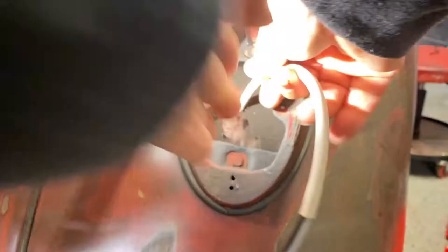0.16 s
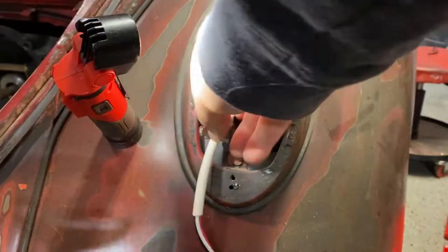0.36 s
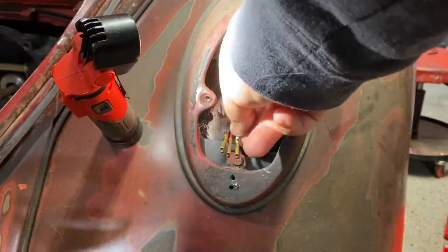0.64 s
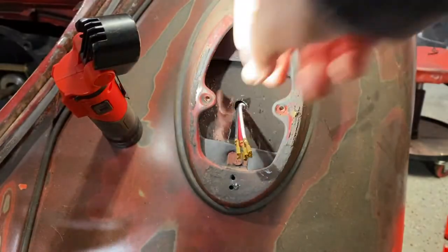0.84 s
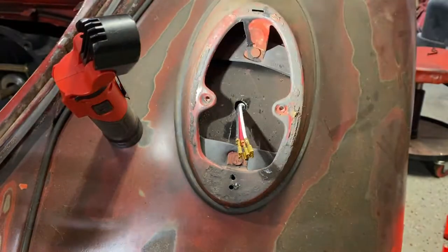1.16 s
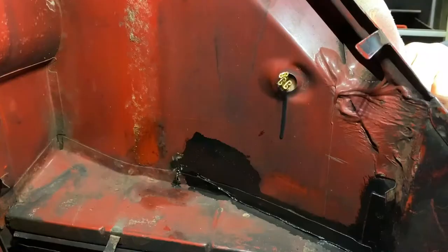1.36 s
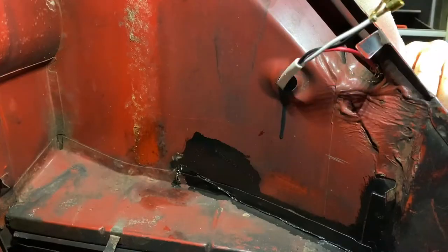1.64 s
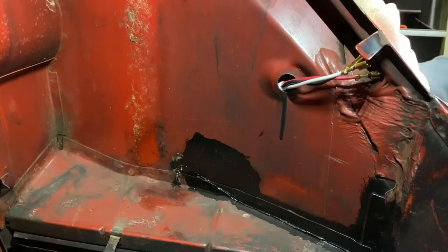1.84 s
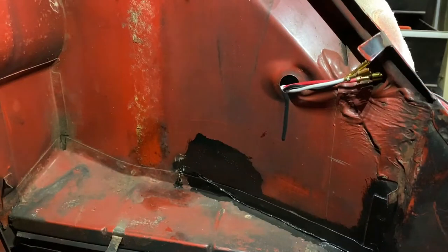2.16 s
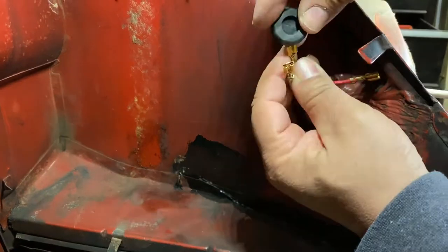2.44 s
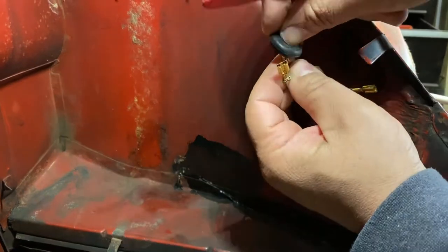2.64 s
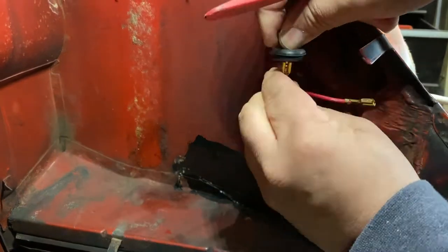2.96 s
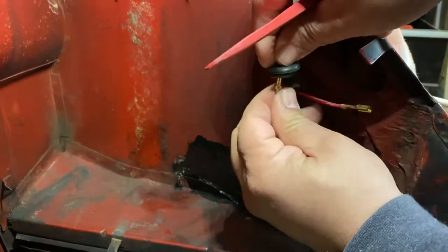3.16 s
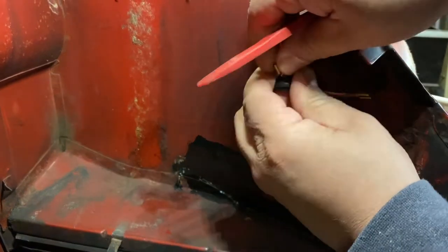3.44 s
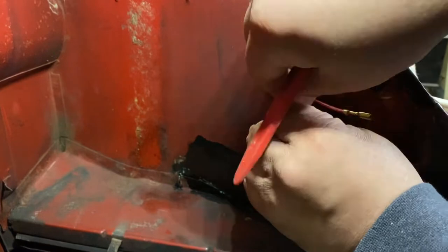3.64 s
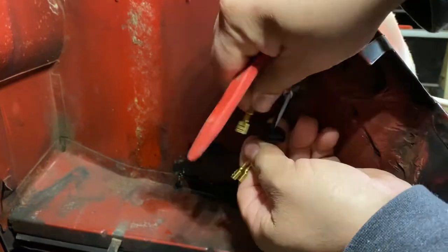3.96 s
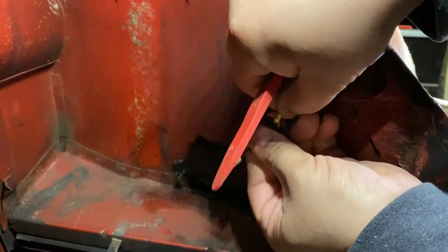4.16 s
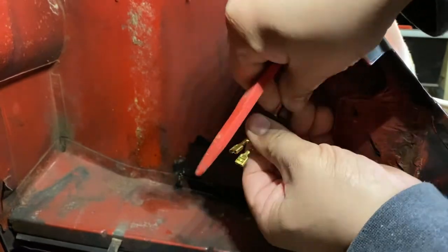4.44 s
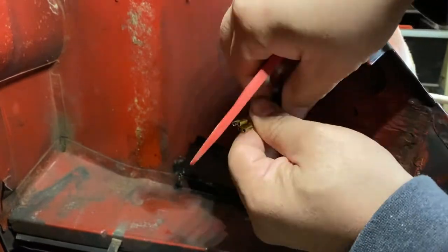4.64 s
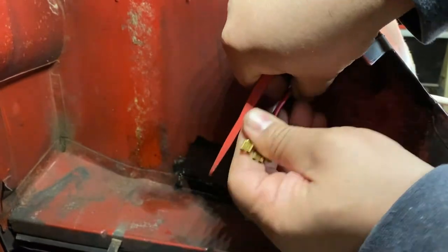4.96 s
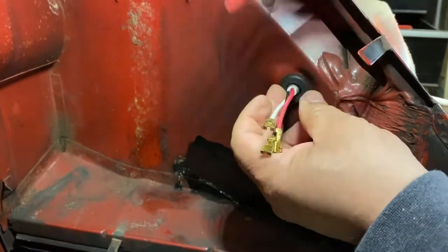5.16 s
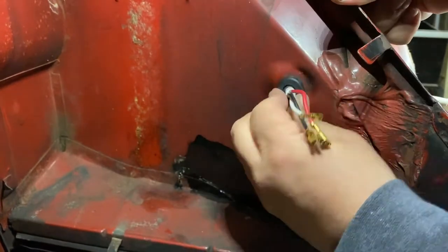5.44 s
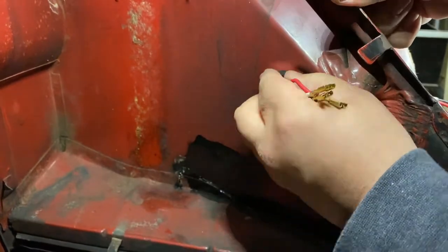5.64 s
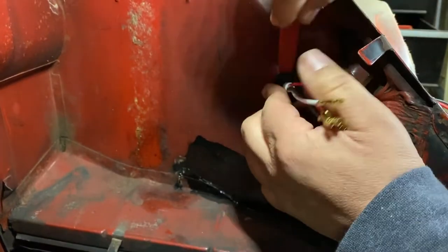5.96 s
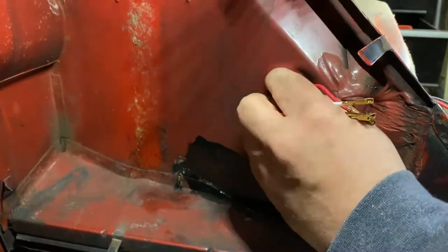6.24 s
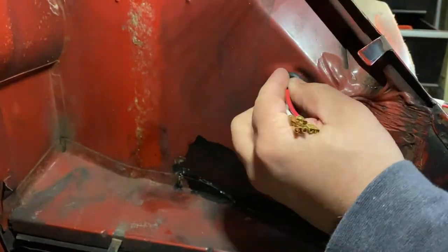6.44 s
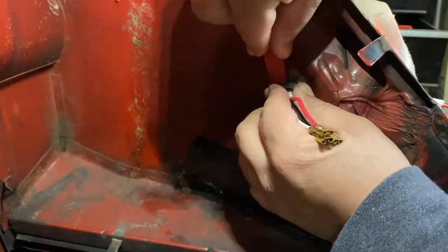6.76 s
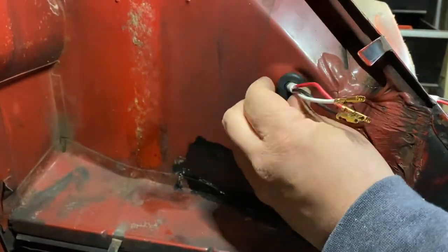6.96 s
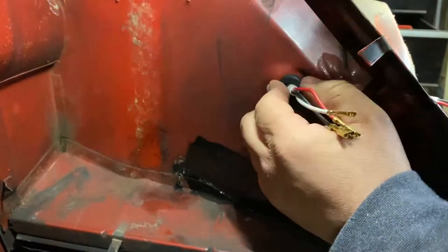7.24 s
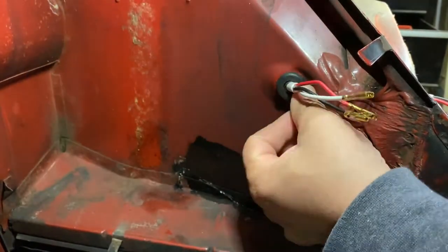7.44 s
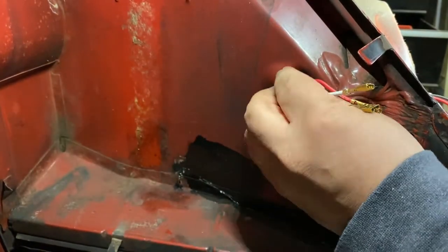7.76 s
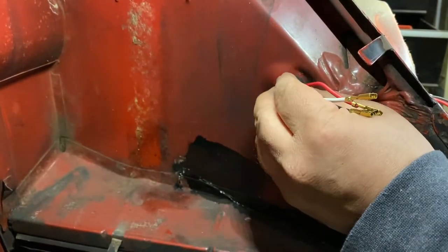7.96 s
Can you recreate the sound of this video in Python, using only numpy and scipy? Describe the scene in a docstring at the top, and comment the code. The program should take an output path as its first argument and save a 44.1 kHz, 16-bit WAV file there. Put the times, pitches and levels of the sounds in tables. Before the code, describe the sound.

Hands push wires through a hollow steel panel and work in a rubber grommet, with soft thuds, rubs and tiny metallic clicks in a quiet workshop.

```python
"""A bundle of wires is nudged through a hole in a bare steel car body and a rubber grommet is worked into it:
each nudge is a burst of random slips ringing a damped panel mode (thud) and a rub resonance, plus scratch noise.
Sleeves swish (dense slips), brass terminals clink (resonated chatter), fingers rustle (shaped friction),
and the panel rings on when let go (decaying noise bands). The shell's rumble and the workshop's hum
are shaped noise; a thin electrical whine is two sines."""
import sys
import numpy as np
from scipy import signal
from scipy.fft import rfft, irfft, next_fast_len
from scipy.io import wavfile
from scipy.ndimage import map_coordinates

SR = 44100
rng = np.random.default_rng(int(sys.argv[2]) if len(sys.argv) > 2 else 0)


def master(y):
    """Save y as 16-bit WAV."""
    cut = np.clip(np.atleast_2d(y).T, -1, 1)
    pcm = np.round(cut * 32767)  # scale
    wavfile.write(sys.argv[1], SR, pcm.astype(np.int16))


N = 357077
TIME = np.arange(N) / SR

# hand activity between shoves, before trims, in two runs of rows: time_s, press_db, rub_db, rustle_db
HAND_ACTIVITY = np.vstack([
    [(0, -61.5, -59, -73.5), (.74, -64.5, -58.5, -79), (.87, -84, -79, -87), (1.02, -73, -73, -73.5),
     (1.29, -84, -81, -90)],
    [(1.35, -55, -59.5, -65), (1.54, -50, -56.5, -68), (1.76, -63.5, -67, -82), (2.02, -65.5, -63, -64.5),
     (2.42, -61.5, -64, -70.5), (2.59, -82.5, -82, -81.5), (2.78, -63.5, -66, -71),
     (3.02, -62.5, -82, -81.5), (3.56, -62, -77, -81.5), (3.87, -58, -60.5, -72), (4.1, -76, -78, -87),
     (4.42, -60.5, -66, -78.5), (4.95, -62.5, -75, -74), (5.22, -64.5, -65.5, -69), (5.72, -61, -74, -83.5),
     (6.2, -52, -64, -69.5), (6.74, -55.5, -65, -79.5), (7.2, -69, -78, -74), (7.52, -64.5, -69, -75),
     (7.68, -84.5, -94, -91), (8.1, -86, -88.5, -95.5)],
])
# spectrum of the shell's slow movement: freq_hz, relative_db
SWAY_SPECTRUM = [(20, -19), (35, -10), (58, -3), (85, -1), (120, -7.5), (170, -7.5), (260, -18)]
# spectrum of light sliding and rustling: freq_hz, relative_db
HISS_SPECTRUM = [(1500, -28), (2600, -6), (4000, -2.5), (6300, -2.5), (8500, -5.5), (12000, -9.5),
                 (15500, -16)]


def from_db(db):
    """Amplitude ratio of a level in dB."""
    return 10 ** (np.asarray(db) / 20)


def rms_one(x):
    """Scale to rms 1."""
    return x / np.sqrt(np.mean(x ** 2) + 1e-30)


def in_time(rows):
    """Columns of a breakpoint curve at every sample."""
    time_s, *columns = np.transpose(rows)
    return [np.interp(TIME, time_s, column) for column in columns]


def drift(rate_hz):
    """Smooth random wander through rate_hz random knots a second; rms 1."""
    knots = rng.standard_normal(4096)
    return rms_one(map_coordinates(knots, [TIME * rate_hz], order=2, mode="wrap"))


def colour(x, spectrum):
    """Filter by a spectrum that falls 24 dB/octave beyond its ends; rms 1."""
    freq_hz, level_db = np.transpose(spectrum)
    size = next_fast_len(N)
    octave = np.log2(np.maximum(np.arange(size // 2 + 1) * SR / size, 1))
    beyond_oct = np.abs(octave - np.clip(octave, np.log2(freq_hz[0]), np.log2(freq_hz[-1])))
    gain = from_db(np.interp(octave, np.log2(freq_hz), level_db) - 24 * beyond_oct)
    return rms_one(irfft(rfft(x, size) * gain, size)[:, :N])


def resonate(x, freq_hz, width_hz):
    """Two-pole resonance, peak gain about 1."""
    radius = np.exp(-np.pi * width_hz / SR)
    zeros = np.array([1, 0, -1]) * (1 - radius ** 2) / 2
    poles = [1, -2 * radius * np.cos(2 * np.pi * freq_hz / SR), radius ** 2]
    return signal.lfilter(zeros, poles, x + 1e-18)


def spot(x, ripple_db, spacing_hz):
    """Random spectral ripple: each spot on the panel favours its own overlapping modes."""
    length = x.shape[-1]
    size = next_fast_len(length)
    freq_hz = np.arange(size // 2 + 1) * SR / size
    ripple = map_coordinates(rng.standard_normal(1024), [freq_hz / spacing_hz], order=2, mode="wrap")
    return irfft(rfft(x, size) * from_db(ripple_db * ripple), size)[:, :length]


def friction(slips_per_s, spread_db):
    """Random slip impulses of uneven size; the lag between the ports jumps at random, so the image is diffuse."""
    likeness, lag_spread_s, lag_hold = 0.7, .0009, 2048  # power share in common; hold in samples
    slips = np.zeros((3, N))
    slipping = rng.random((3, N)) < slips_per_s / SR
    sizes = rng.standard_normal((3, N))[slipping]
    signs = rng.choice([-1, 1], (3, N))[slipping]
    slips[slipping] = signs * from_db(spread_db * np.clip(sizes, -2, 2))
    shared, left, right = slips
    lag = np.repeat(rng.normal(0, lag_spread_s * SR, N // lag_hold + 1), lag_hold)[:N].astype(int)
    shifted = shared[np.clip(np.arange(N) + lag, 0, N - 1)]
    common, separate = np.array([shared, shifted]), np.array([left, right])
    return rms_one(np.sqrt(likeness) * common + np.sqrt(1 - likeness) * separate)


def around(mid_s):
    """Samples within 0.12 s of a touch."""
    return slice(max(int((mid_s - .12) * SR), 0), min(int((mid_s + .12) * SR), N))


def stroke(x, mid_s, half_s, level_db, steepness=1.71, skew=0.016):
    """Spindle-shaped envelope, nearly symmetric around mid_s; level_db is the level at its height."""
    age_s = TIME[around(mid_s)] - mid_s
    side_s = half_s * (1 + skew * np.sign(age_s))
    envelope = np.exp(-np.abs(age_s / side_s) ** steepness)
    return from_db(level_db) * rms_one(x * envelope) * np.sqrt(np.mean(envelope ** 2))


def workshop(air_db=-69.5, early_db=-7.5, waver_db=0.5):
    """Low shaped room noise, quieter early on, and a thin wavering whine with a steady octave."""
    whine_hz, overtone_hz, overtone_db = 7850, 15699, -88
    # room noise spectrum: freq_hz, relative_db
    air_spectrum = [(25, -17.5), (60, -1), (120, 0.5), (250, -17.5), (500, -29.5), (1000, -30.5),
                    (1700, -33.5), (3000, -44.5), (8000, -46.5), (15500, -43.5)]
    # electrical whine, mean level: time_s, level_db
    whine_curve = [(0, -104), (2.4, -98.5), (2.7, -88.5), (3.6, -85), (4.1, -89), (5.6, -86.5), (6.1, -95),
                   (8.1, -99)]
    level_db = air_db + early_db * np.clip(2.5 - TIME, 0, 1)
    air = from_db(level_db) * colour(rng.standard_normal((2, N)), air_spectrum)
    whine_db = in_time(whine_curve)[0] + waver_db * drift(rate_hz=9)
    whine = from_db(whine_db) * np.sin(2 * np.pi * whine_hz * TIME)
    overtone = from_db(overtone_db) * np.sin(2 * np.pi * overtone_hz * TIME)
    return air + np.sqrt(2) * (whine + overtone)  # sines to rms level


def sway(unsteady_db=3.5, lean_trim_db=6.5):
    """The big steel shell rumbles unevenly, more under harder pressing, and bumps softly when leaned on."""
    middling_db, middling_press_db, press_share, lean_half_s = -65.5, -65.5, 0.62, .028
    # an arm leans on the shell, level before trim: mid_s, level_db
    leans = [(.125, -63), (.44, -64), (1.89, -56), (2.0, -57), (3.9, -61), (4.62, -58.5), (4.92, -58.5),
             (5.66, -56.5), (7.639, -64)]
    press_db = in_time(HAND_ACTIVITY)[0]
    level_db = middling_db + press_share * (press_db - middling_press_db) + unsteady_db * drift(rate_hz=22)
    out = from_db(level_db) * colour(rng.standard_normal((2, N)), SWAY_SPECTRUM)
    heave = colour(rng.standard_normal((2, N)), SWAY_SPECTRUM)
    for mid_s, lean_db in leans:
        at = around(mid_s)
        out[:, at] += stroke(heave[:, at], mid_s, lean_half_s, lean_db + lean_trim_db)
    return out


def handling(grip_db=4.5, flicker_db=3.5, press_trim_db=-1.0, rub_trim_db=-3.5, rustle_trim_db=-2.5):
    """Fingers never quite stop: fine friction in three bands follows one unsteady grip."""
    # pressing spectrum: freq_hz, relative_db
    press_spectrum = [(110, -21.5), (190, -4), (310, 3.5), (450, -5), (650, -5), (1000, -24.5)]
    # rubbing spectrum: freq_hz, relative_db
    rub_spectrum = [(450, -17.5), (800, 4), (1300, 0), (1750, -1), (2400, -9), (3800, -16.5)]
    press_db, rub_db, rustle_db = in_time(HAND_ACTIVITY)
    bands = [(press_db + press_trim_db, press_spectrum),
             (rub_db + rub_trim_db, rub_spectrum),
             (rustle_db + rustle_trim_db, HISS_SPECTRUM)]
    grip = grip_db * drift(rate_hz=42)
    out = np.zeros((2, N))
    for level_db, spectrum in bands:
        grain = spot(friction(slips_per_s=2200, spread_db=4), ripple_db=2, spacing_hz=90)
        flicker = flicker_db * drift(rate_hz=67)
        out += from_db(level_db + grip + flicker) * colour(grain, spectrum)
    return out


def panel_ring(waver_db=5.5, mode_width_hz=45, trim_db=0.5):
    """Let go, the panel rings on: each mode is a narrow noise band, wavering as it decays."""
    # the hand lets go, level before trim: start_s, level_db
    releases = [(1.595, -50), (7.535, -54)]
    # free panel modes: freq_hz, relative_db, t60_s
    panel_modes = [(590, 3, 0.22), (1802, -10.5, 0.25), (3485, -17.5, 0.15)]
    out, noise = np.zeros((2, N)), rng.standard_normal((2, N))
    for freq_hz, mode_db, t60_s in panel_modes:
        waver = waver_db * drift(rate_hz=37)
        for start_s, level_db in releases:
            at = slice(int(start_s * SR), int(start_s * SR) + SR // 4)
            age_s = TIME[at] - start_s
            rise = np.minimum(age_s / .005, 1)
            ring = rms_one(resonate(noise[:, at], freq_hz, mode_width_hz))
            ring_db = level_db + trim_db + mode_db + waver[at] - 60 * age_s / t60_s
            out[:, at] += rise * from_db(ring_db) * ring
    return out


def swishes():
    """Sleeve or insulation slides lightly: very dense slips, no panel resonance."""
    # light slides: mid_s, half_s, brush_db, hiss_db
    slides = [(0.913, 0.0086, -51, -57), (0.941, 0.019, -61, -57), (1.059, 0.0078, -71, -75),
              (1.832, 0.017, -59.5, -61), (2.171, 0.018, -39.5, -41), (2.725, 0.02, -63.5, -54),
              (5.058, 0.018, -59, -56.5), (6.001, 0.014, -51, -55.5), (6.029, 0.017, -51.5, -48),
              (6.084, 0.023, -55, -53.5), (6.728, 0.011, -53.5, -62), (6.9, 0.018, -80, -64.5),
              (7.135, 0.008, -94, -64)]
    # lower, brushing spectrum: freq_hz, relative_db
    brush_spectrum = [(400, -21), (700, -9.5), (1100, -0.5), (1700, 0.5), (2400, -7), (3600, -7.5)]
    out, fibres = np.zeros((2, N)), friction(slips_per_s=14000, spread_db=2.5)
    brush, hiss = colour(fibres, brush_spectrum), colour(fibres, HISS_SPECTRUM)
    for mid_s, half_s, brush_db, hiss_db in slides:
        at = around(mid_s)
        out[:, at] += stroke(brush[:, at], mid_s, half_s, brush_db)
        out[:, at] += stroke(hiss[:, at], mid_s, half_s, hiss_db)
    return out


def terminals():
    """Brass tabs chatter for milliseconds: one many-mode rap on the steel, several one-mode clinks."""
    # rap on the steel, one row: mid_s, half_s, level_db
    rap = (1.589, 0.0068, -26.5)
    # modes of the rap: freq_hz, width_hz, relative_db
    rap_modes = [(1690, 70, 2.5), (3730, 49, -8.5), (4330, 120, -3), (5330, 90, 2.5), (5974, 83, -2),
                 (6060, 100, -4.5), (6120, 110, 6), (6810, 100, -16)]
    # terminals touching: mid_s, half_s, level_db, freq_hz, width_hz
    clinks = [(1.348, 0.005, -54, 2900, 2480), (1.739, 0.0077, -40, 14000, 2530),
              (2.044, 0.014, -50, 6970, 160), (2.941, 0.0056, -63.5, 4200, 400),
              (3.659, 0.0064, -61.5, 6040, 1010), (3.687, 0.0064, -61.5, 5500, 1200),
              (3.747, 0.0052, -47.5, 9000, 7000), (3.808, 0.011, -63.5, 11500, 6000),
              (4.763, 0.0078, -48.5, 7100, 2450), (4.808, 0.01, -60.5, 7360, 2500),
              (5.238, 0.012, -61, 6400, 1210), (6.825, 0.012, -62, 7200, 2620),
              (7.123, 0.019, -62.5, 9600, 2000), (7.192, 0.023, -61.5, 10000, 3500),
              (7.868, 0.013, -81.5, 8820, 6020)]
    out, chatter = np.zeros((2, N)), friction(slips_per_s=1500, spread_db=2)
    mid_s, half_s, level_db = rap
    at = around(mid_s)
    ring = 0
    for freq_hz, width_hz, mode_db in rap_modes:
        ring = ring + from_db(mode_db) * rms_one(resonate(chatter[:, at], freq_hz, width_hz))
    out[:, at] += stroke(ring, mid_s, half_s, level_db)
    for mid_s, half_s, level_db, freq_hz, width_hz in clinks:
        at = around(mid_s)
        clink = resonate(chatter[:, at], freq_hz, width_hz)
        out[:, at] += stroke(clink, mid_s, half_s, level_db)
    return out


def fidgets(count=70):
    """Small random slips, as strong as the hands are busy; rows in the columns of the shoves."""
    typical_half_s, typical_thud_hz, offset_db, spread_db = 0.0074, 414, 2.5, 3.5
    chance, size = rng.random(count), rng.standard_normal((count, 5))
    mid_s = (np.arange(count) + chance) / count * TIME[-1]
    knots_s, press_db, rub_db, rustle_db = np.transpose(HAND_ACTIVITY)

    def slip_db(activity_db, own_size):
        """Hand activity at each slip, with partly shared random spread."""
        spread = spread_db * (size[:, 0] + own_size) / np.sqrt(2)
        return np.interp(mid_s, knots_s, activity_db) + offset_db + spread

    half_s = typical_half_s * np.exp(0.27 * size[:, 3])
    thud_hz = typical_thud_hz * np.exp(.25 * size[:, 4])
    return np.column_stack([mid_s, half_s, slip_db(press_db, size[:, 1]), thud_hz,
                            slip_db(rub_db, size[:, 2]), slip_db(rustle_db, size[:, 2])])


def swing(at, freq_hz, port_spread_rad=0.43):
    """One panel mode as a sine, slightly different in phase at the two ports; rms 1."""
    phase = rng.uniform(0, 2 * np.pi) + rng.normal(0, port_spread_rad, (2, 1))
    return np.sqrt(2) * np.sin(2 * np.pi * freq_hz * TIME[at] + phase)


def nudges(rows, thud_rel_width=0.89, rub_rel_width=1.0, rub_trim_db=-2.0, firm_db=-30.5,
           thump_hz=195, thump_width_hz=85, thump_db=-14.0, heave_db=-20.5):
    """Slips drive two damped resonances: thud pitch given per row, rub pitch higher the more scratch
    there is against rub."""
    scratchy_rub_hz, rub_db_per_octave = 1280, 31  # highest rub pitch; scratch deficit per octave down
    # scratch spectrum: freq_hz, relative_db
    scratch_spectrum = [(1600, 1.5), (2600, 0), (4000, -2), (6300, -7), (8500, -12), (12000, -16.5),
                        (15500, -17)]
    out = np.zeros((2, N))
    pushes, slips = friction(slips_per_s=1300, spread_db=2), friction(slips_per_s=1200, spread_db=4.5)
    slips = signal.sosfilt(signal.butter(2, 3400, fs=SR, output="sos"), slips)  # soft rubber and skin
    scratch = colour(friction(slips_per_s=1400, spread_db=2), scratch_spectrum)
    # the whole panel gives a little, the shell behind it more slowly
    thump = resonate(resonate(pushes, thump_hz, thump_width_hz), thump_hz, thump_width_hz)
    heave = colour(rng.standard_normal((2, N)), SWAY_SPECTRUM)
    for mid_s, half_s, thud_db, thud_hz, rub_db, scratch_db in rows:
        at = around(mid_s)
        rub_hz = scratchy_rub_hz * 2 ** (min(scratch_db - rub_db, 0) / rub_db_per_octave)
        thud, rub = pushes[:, at], slips[:, at]
        for _ in range(2):
            thud = resonate(thud, thud_hz, thud_rel_width * thud_hz)
            rub = resonate(rub, rub_hz, rub_rel_width * rub_hz)
        thud = rms_one(spot(thud, ripple_db=4.5, spacing_hz=55))
        thud = thud + from_db(thud_db - firm_db) * swing(at, thud_hz)  # firm push: cleaner mode
        rub = spot(rub, ripple_db=4.2, spacing_hz=75)
        grit = spot(scratch[:, at], ripple_db=4.5, spacing_hz=140)
        give = 2 * thump_hz / thud_hz  # stiff spots give less
        out[:, at] += stroke(heave[:, at], mid_s, 2 * half_s, thud_db + heave_db)
        out[:, at] += stroke(thump[:, at], mid_s, half_s, thud_db + thump_db) * give
        out[:, at] += stroke(thud, mid_s, half_s, thud_db)
        out[:, at] += stroke(rub, mid_s, half_s, rub_db + rub_trim_db)
        out[:, at] += stroke(grit, mid_s, half_s, scratch_db)
    return out


def cavity(x, t60_s=0.23, wet_db=-24.5, dull_hz=2000):
    """The steel hollow adds a short, dull tail of decaying noise."""
    age_s = TIME[:SR // 3]
    lowpass = signal.butter(1, dull_hz, fs=SR, output="sos")
    tail = signal.sosfilt(lowpass, rng.standard_normal((2, len(age_s))))
    decay = from_db(-60 * age_s / t60_s)
    echo = tail * decay / np.sqrt(np.sum(decay ** 2))
    return x + from_db(wet_db) * signal.fftconvolve(x, echo, axes=1)[:, :N]


def scene():
    """Touches in the hollow, slightly to the left, over rumble and workshop."""
    # shoves of wire or rubber: feeding in, pulling through, threading the grommet, pressing it home;
    # rub level before trim: mid_s, half_s, thud_db, thud_hz, rub_db, scratch_db
    shoves = [ (.067, 0.01, -52, 640, -39.5, -51), (.1, 0.023, -43.5, 500, -34.5, -48),
              (.148, 0.012, -36.5, 400, -34, -83.5), (.245, 0.011, -49.5, 530, -69, -61.5),
              (.309, 0.0074, -43.5, 560, -47.5, -65), (.349, 0.014, -59, 645, -44, -51.5),
              (.405, 0.02, -67, 540, -48, -54.5), (.446, 0.011, -48, 560, -56, -65),
              (.575, 0.0068, -50, 530, -42.5, -66), (.613, 0.0096, -52, 550, -26.5, -45),
              (.66, 0.015, -49, 650, -47, -59), (.721, 0.017, -39.5, 700, -41, -54),
              (1.351, 0.0067, -61, 375, -47, -50), (1.378, 0.011, -32, 382.5, -41.5, -52),
              (1.451, 0.012, -47, 303, -42, -48.5), (1.494, 0.0093, -27, 300, -41, -75),
              (1.54, 0.017, -41, 289, -41.5, -65), (1.595, 0.0076, -28.5, 486, -39, -41.5),
              (1.743, 0.01, -44, 555, -41, -42), (1.897, 0.027, -48, 300, -50, -54.5),
              (2.0, 0.014, -49.5, 330, -66, -68), (2.086, 0.0049, -49, 409, -59, -73),
              (2.305, 0.029, -51.5, 313, -63, -76), (2.409, .02, -44, 312, -47, -46.5),
              (2.941, 0.0057, -53, 554, -60, -75), (3.013, 0.015, -57, 257, -70.5, -94),
              (3.215, 0.025, -46.5, 290, -66, -67), (3.429, 0.017, -52, 425, -62, -88),
              (3.641, 0.015, -52, 384, -61, -69), (3.756, 0.0061, -44.5, 251, -47.5, -74),
              (3.961, 0.022, -47, 503, -59, -63), (4.066, 0.0038, -53, 273, -62, -61.5),
              (4.343, 0.024, -51.5, 288, -65, -64.5), (4.436, 0.032, -53.5, 371, -69, -62.5),
              (4.61, 0.027, -45.5, 334, -51, -75), (4.693, 0.0076, -61, 335, -51, -73),
              (4.744, 0.0055, -38, 328, -48, -73), (4.764, 0.021, -35, 406, -42.5, -55.5),
              (4.891, 0.018, -48.5, 233, -59.5, -84), (5.069, 0.014, -41.5, 418, -49.5, -68),
              (5.131, .012, -43.5, 380, -36.5, -59), (5.277, 0.01, -45.5, 294, -68, -84),
              (5.319, 0.012, -44.5, 301, -70, -71), (5.426, 0.016, -48, 539, -71, -66.5),
              (5.647, 0.013, -48.5, 282, -49, -83), (5.799, 0.01, -41.5, 456, -38, -57.5),
              (5.845, 0.02, -37.5, 466, -38.5, -55.5), (6.134, 0.011, -39, 406, -48, -50.5),
              (6.238, 0.011, -45, 481, -40, -60), (6.29, .021, -46, 396, -49, -84),
              (6.339, .012, -42.5, 325, -45, -73), (6.403, .012, -36.5, 294, -38, -52),
              (6.466, 0.0068, -52, 395, -47, -59.5), (6.496, 0.014, -39, 336, -41, -53),
              (6.588, 0.019, -42, 469, -70, -71), (6.65, 0.028, -47.5, 420, -60, -88),
              (6.773, .017, -41.5, 293, -46.5, -54.5), (6.836, .028, -50.5, 556, -55.5, -70.5),
              (6.935, 0.019, -66, 400, -58.5, -62.5), (6.978, .018, -50, 458, -58.5, -84),
              (7.115, 0.017, -54.5, 414, -62.5, -65), (7.29, 0.039, -87, 400, -67.5, -71),
              (7.45, 0.016, -48, 270, -53.5, -71), (7.506, 0.0077, -47.5, 330, -59, -90),
              (7.542, 0.014, -49.5, 440, -53.5, -54), (8.04, 0.013, -63, 276, -72.5, -83)]
    # brief drop of everything but the workshop: time_s, gain_db
    lull = [(2.089, 0.5), (2.093, -28), (2.132, -19), (2.15, 0)]
    in_hollow = nudges(np.vstack([shoves, fidgets()])) + swishes() + terminals()
    touches = cavity(in_hollow) + panel_ring() + handling()
    pan_gain = from_db([[.4], [-.4]])
    lull_gain = from_db(in_time(lull)[0])
    return (touches * pan_gain + sway()) * lull_gain + workshop()


def record(dry):
    """Steep elliptic low-pass at 15.9 kHz."""
    return signal.sosfilt(signal.ellip(12, .2, 80, 15900, fs=SR, output="sos"), dry)


dry = scene()
out = record(dry)
master(out)
```